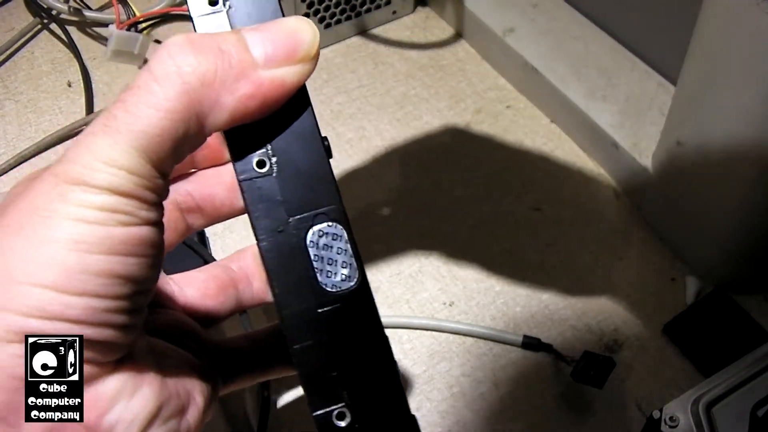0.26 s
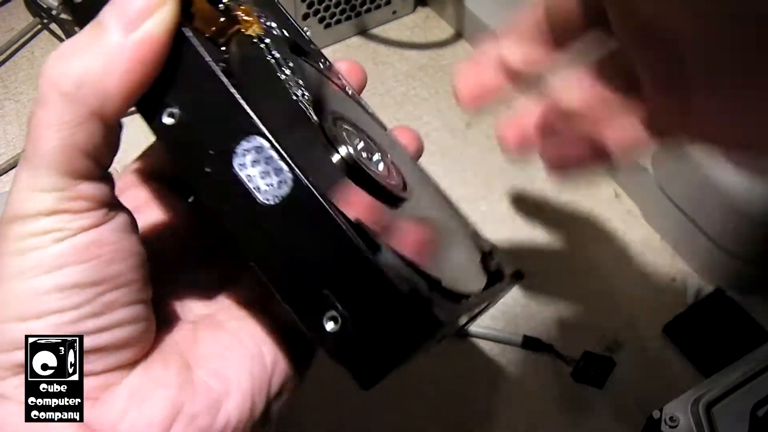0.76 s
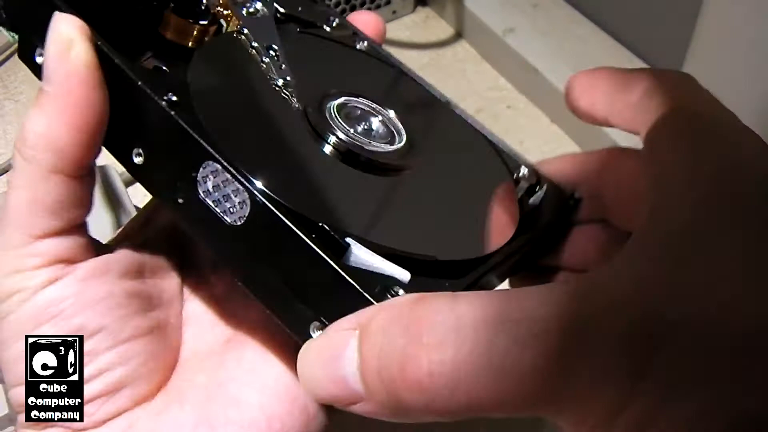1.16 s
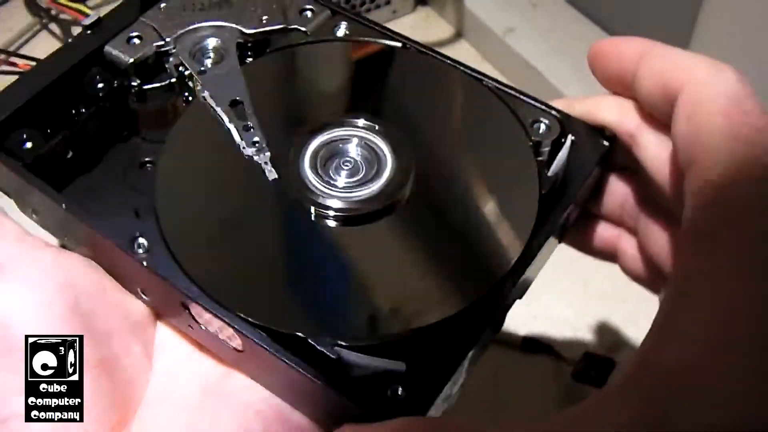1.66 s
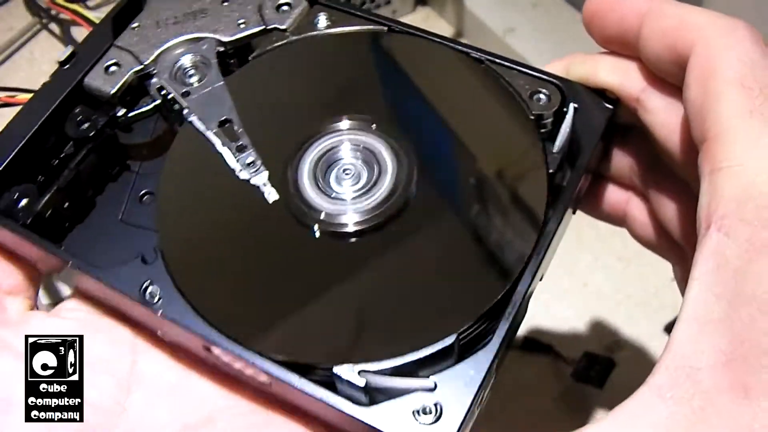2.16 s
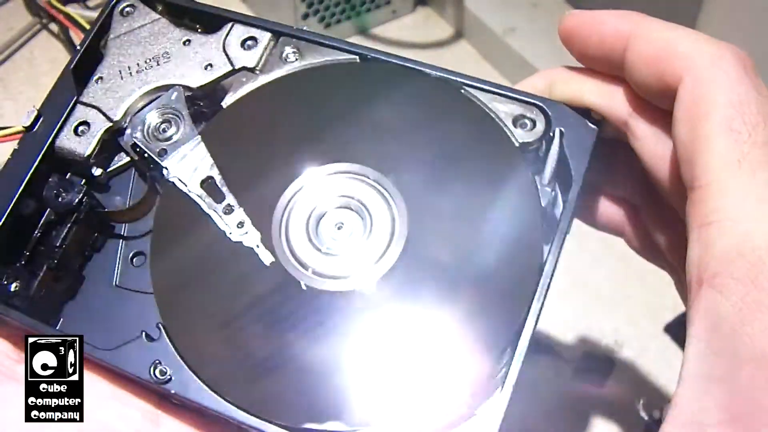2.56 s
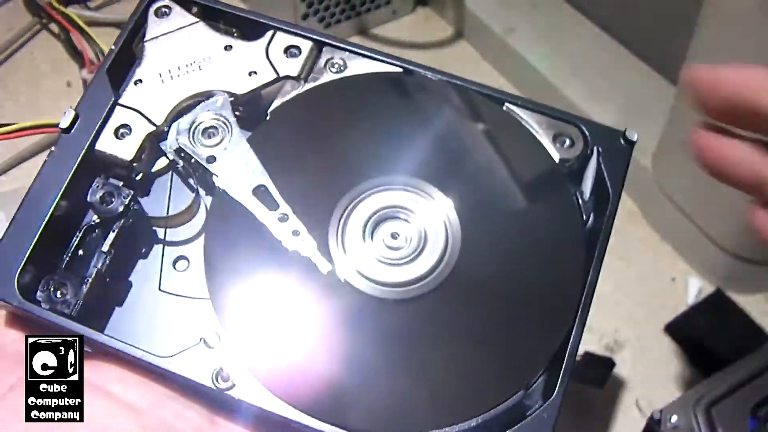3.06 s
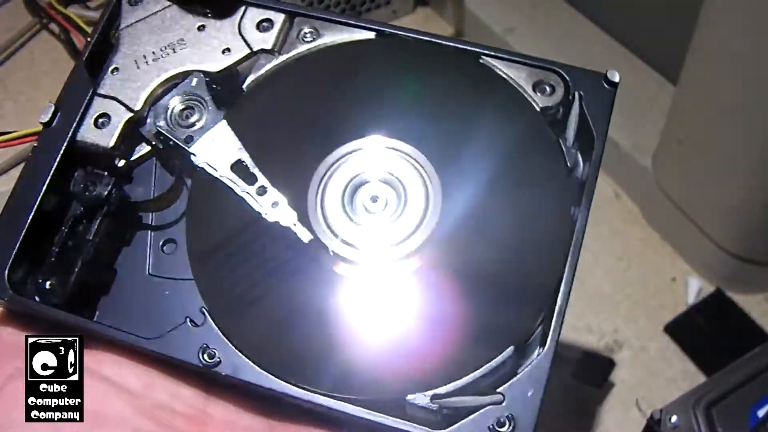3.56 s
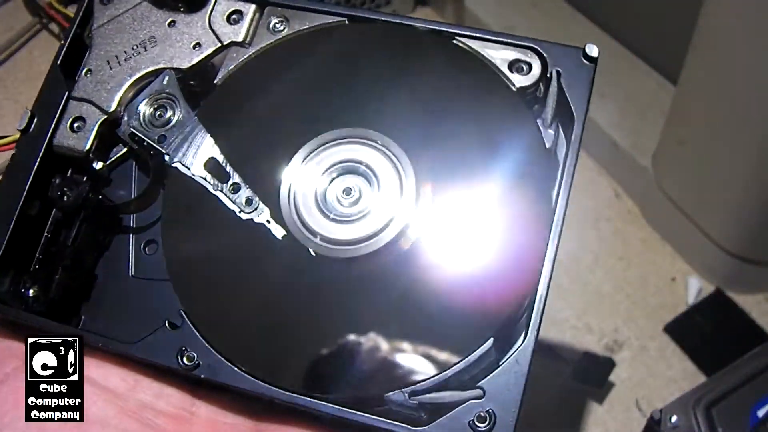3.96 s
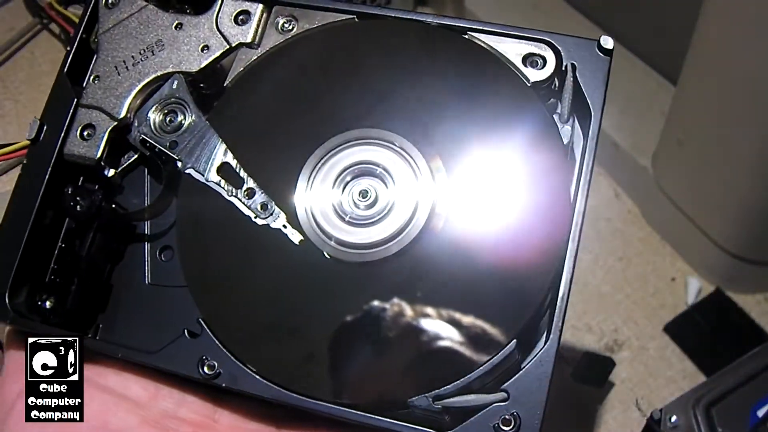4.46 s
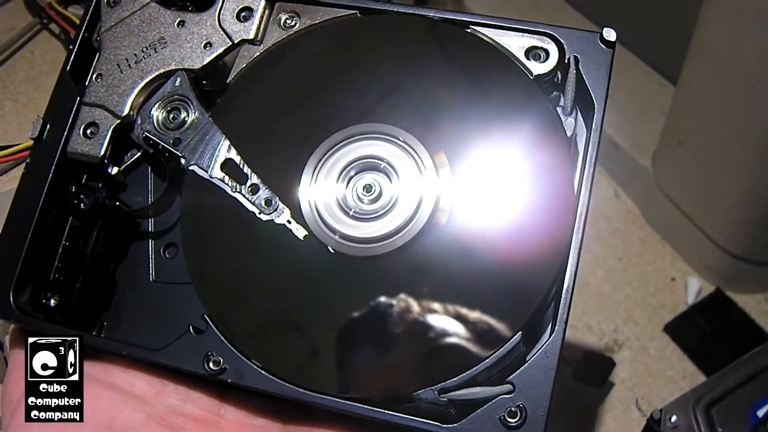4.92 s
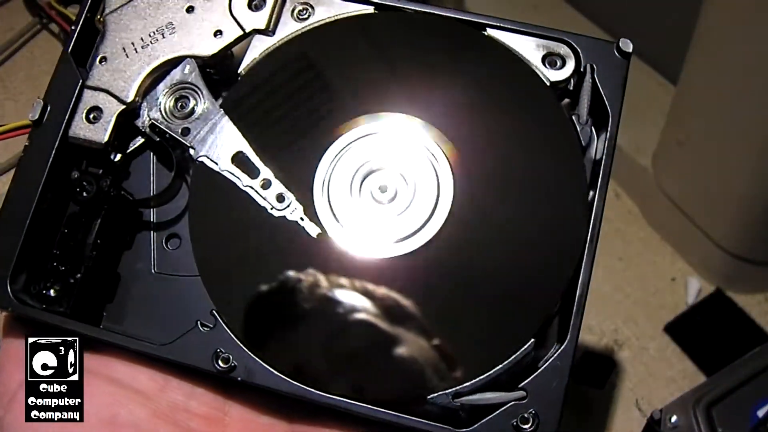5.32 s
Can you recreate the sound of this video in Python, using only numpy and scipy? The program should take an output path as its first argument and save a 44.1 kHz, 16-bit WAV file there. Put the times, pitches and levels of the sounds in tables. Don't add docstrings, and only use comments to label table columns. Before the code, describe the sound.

Short rattling start-up buzz, a few sharp taps, then a spinning disk motor chatters brightly and swells into a breathy, brightening whoosh of air.

```python
import sys
import numpy as np
from scipy import signal
from scipy.fft import rfft, irfft, next_fast_len
from scipy.io import wavfile
from scipy.ndimage import uniform_filter1d

SR = 44100
rng = np.random.default_rng(int(sys.argv[2]) if len(sys.argv) > 2 else 0)


def unload_wav(signal):
    wavfile.write(
        sys.argv[1],
        SR,
        np.round(np.clip(np.atleast_2d(signal).T, -1, 1) * 32767).astype(np.int16),
    )


def invert_db(level):
    return 10 ** (np.asarray(level, dtype=float) / 20)


N = 246519
T = np.arange(N) / SR


def speed(t):
    start_s, gain_per_s, top_steps_per_s = .623, 98.1, 990
    return top_steps_per_s * np.tanh(gain_per_s * np.maximum(t - start_s, .01) / top_steps_per_s)


def whine():
    # f/Hz, width/Hz
    frame_low = [(6000, 100), (6780, 110), (7100, 70), (7730, 90), (8430, 120), (9300, 200), (10110, 140)]
    # f/Hz, width/Hz
    frame_mid = [(11280, 260), (12280, 170), (13020, 200), (13300, 250), (13600, 200)]
    # f/Hz, width/Hz
    frame_top = [(14030, 220), (15150, 150), (15620, 180)]
    # level/dB, loudest at speed/(steps/s)
    wake = [(-9.5, 140), (-4, 286), (-19, 95), (-5.5, 230), (-7.5, 247), (-5.5, 228), (-3, 248), (-10, 174),
            (-6.5, 230), (-6.5, 220), (-5.5, 82), (-9, 360), (-4.5, 220), (-10.5, 124), (-3.5, 115)]
    # f/Hz, level/dB
    between = [(2500, -41), (4500, -12), (5500, -7), (6500, -2), (8000, -2), (11000, -2), (14000, -2),
               (16000, -11)]
    # multiple, level/dB, loudest at t/s, duration/s
    multiples = [
        (48, -48, 4.0, .25),
        (38, -49, 4.35, .25),
        (32, -49, 4.65, .3),
        (24, -48, 5.0, .5),
    ]
    coils_on_s, rise_s = .9, .04
    full_steps_per_s = 243
    lull_db, lull_steps_per_s, lull_spread = -3, 370, 30

    rate = speed(T)
    level_db = -39.5 + 2.5 * np.log2(np.minimum(rate / full_steps_per_s, 1))
    level_db = level_db + lull_db * bump(rate, lull_steps_per_s, lull_spread)
    on = np.clip((T - coils_on_s) / rise_s + .5, 0, 1) * (T > coils_on_s)

    steps = np.cumsum(rate * (T > coils_on_s)) / SR
    snap = np.diff(np.floor(steps), prepend=0) * np.sqrt(SR / rate)
    chatter = (.9 + np.exp(-(steps % 1) / .35)) * rng.standard_normal(N)
    drive = .3 * snap + chatter

    rings = 0
    for (hz, width), (db, best) in zip(frame_low + frame_mid + frame_top, wake):
        waver = invert_db(db + 1.1 * drift(3.096))
        rings = rings + waver * bump(rate, best, 94) * evened(ring(drive, hz, width))
    broad = evened(shaped(drive, lambda hz: invert_db(read(between, hz))))
    clean = 0
    for k, db, s, span in multiples:
        clean = clean + invert_db(db) * bump(T, s, span) * np.cos(2 * np.pi * k * steps) * (k * rate < 17000)
    return invert_db(level_db) * (rings + broad) * on + clean


def search():
    # start t/s, hold/s, level/dB
    search_at = (.318, .542, -33)
    weak_kicks = [2, 4, 6, 8, 10]
    # f/Hz, level/(dB per Hz)
    kick_colour = [(1060, -12), (1800, 7.5), (2380, -38), (2680, -24), (2910, -5.5), (3320, -5.5),
                   (5580, -7), (6650, 0), (9120, -4.5), (9820, -8), (14000, -9), (16000, -16), (16500, -46)]
    # f/Hz, width/Hz, level/dB
    kick_rings = [(2730, 35, -8), (3300, 36, -13), (4500, 36, -17), (4860, 33, -1), (5470, 71, -4),
                  (6000, 54, -5), (6240, 27, -3), (6900, 49, 5), (7600, 32, -8), (7800, 38, 2),
                  (8230, 50, 0.5), (8460, 22, -6), (9280, 36, 1), (10800, 70, -7)]
    kicks_hz, release_s = 161.2, .012

    start, hold, top_db = search_at
    end = start + hold + release_s
    since = np.clip(T - start, 0, hold)
    level_db = top_db + held_db(start, hold, 0, 16 / release_s)
    low_db = -21.5 + 20 * since
    middle_db = -8 - 11 * np.exp(-since / .08)

    kicks = (T - start) * kicks_hz
    on = (T >= start) & (T < end)
    strength = on * np.where(np.isin(kicks.astype(int), weak_kicks), .25, 1)
    burst = 8 * smear(spread_ms=1.3)
    alike = 1.48 * signal.oaconvolve(np.diff(np.floor(kicks), prepend=0), burst)[:N]
    swell = np.sin(np.pi * np.minimum(kicks % 1 / 0.8, 1) ** 0.48) ** 2
    puff = (0.51 + swell) * rng.standard_normal(N)
    drive = strength * (alike + puff)

    broad = shaped(drive, lambda hz: invert_db(read(kick_colour, hz)))
    patches = [invert_db(1.1 * drift(11.4)) * ring(broad, hz, 1200) for hz in np.linspace(2800, 15400, num=15)]
    broad = evened(sum(patches))
    broad = signal.sosfilt(signal.butter(6, 2550, "high", fs=SR, output="sos"), broad)
    rings = [invert_db(db + 1.5 * drift(6.5)) * ring(drive, hz, width + 30) for hz, width, db in kick_rings]
    low = invert_db(low_db) * evened(ring(ring(drive, 2740, 55), 2620, 120))
    middle = invert_db(middle_db) * evened(ring(ring(drive, 6745, 70), 6800, 200))
    body = invert_db(0.5) * broad + invert_db(-6.5) * evened(sum(rings)) + invert_db(-2.0) * low + invert_db(-6.0) * middle
    return invert_db(level_db) * body * np.sqrt((end - start) * SR / N)


def air():
    # f/Hz, level/(dB per Hz)
    rush_colour = [(150, -47.5), (250, -19.5), (513, -21.5), (868, -15), (1210, -10.5), (1600, -2),
                   (2010, -6), (2860, -2.5), (4670, -6.5), (7370, -10.5), (7760, -14), (9420, -11.5),
                   (13000, -20), (15700, -21), (16500, -53)]
    # f/Hz, width/Hz, level/dB
    hollow_rings = [(1622, 320, 4), (2374, 450, 4.5), (2790, 220, 2.5), (3700, 550, 2), (840, 77, 3.5)]
    # f/Hz, growth/(dB per dB)
    growth = [(400, 0.95), (780, .8), (1150, 0.88), (1600, 0.85), (2050, 1.09), (2800, 1.18), (3400, 1.21),
              (4300, 1.43), (5500, 1.21), (9000, 1.33), (15000, 1.35)]
    from_steps_per_s = 107

    def field_db(hz, t):
        hollows = sum(db / (1 + (2 * (hz - f) / width) ** 2) for f, width, db in hollow_rings)
        excess = np.maximum(speed(t) - from_steps_per_s, 1)
        under_db = 32.5 * np.log10(excess / (speed(N / SR) - from_steps_per_s))
        return read(rush_colour, hz) + hollows + read(growth, hz) * under_db

    noise = hiss(field_db, patchy_db=0.53)
    return invert_db(-17) * noise / noise[:, -SR // 4:].std()


def clicks():
    # t/s, peak level/dB, scuff level/dB, time until the grip stops the ring/ms
    touches = [
        (0.0094, -26, 0.5, 150),
        (0.2434, -37, -1, 12),
        (0.531, -28, -3, 5.2),
        (0.868, -31, -1, 40),
        (1.3394, -12, -1.5, 14),
        (1.3566, -21.5, -7, 9),
        (1.4369, -31, 3, 8),
        (1.6504, -15, -3, 37),
        (1.938, -10.5, -2.5, 11.6),
    ]
    # f/Hz, level/dB, time to fall 60 dB/s
    lid = [(2090, -17.5, 0.6), (2520, 2, 0.0073), (5000, 0, 0.0071), (6200, 4, .01), (7460, 7, .008)]
    # f/Hz, level/dB, time to fall 60 dB/s
    skin = [(2360, -4, 0.011), (4800, 3, 0.0069), (6100, -3, 0.011), (7400, 8, .008)]
    # f/Hz, level/dB, time to fall 60 dB/s
    latch = [(1600, -3.5, 0.14), (2625, -5.5, 0.039), (3450, -29, 0.018), (4790, -16, 0.026),
             (6250, -29, .02)]
    # f/Hz, level/dB, time to fall 60 dB/s
    stop = [(1300, 0, 0.022), (1900, -6, 0.022), (2750, 2, 0.022), (7770, -8, .2)]
    # f/Hz, level/dB, time to fall 60 dB/s
    case = [(1850, 4, 0.0082), (2500, 4, 0.0065), (4800, -15, 0.0052), (5500, 5, 0.011), (7100, -12, 0.011),
            (10600, -10, .008)]
    # f/Hz, level/dB, time to fall 60 dB/s
    rim = [(2260, -8, 0.0043), (2770, 0, 0.005), (3430, 1, 0.0036), (6140, -2, .015), (1870, -16, 0.12)]
    parts = [lid, skin, latch, stop, case, skin, skin, rim, latch]
    rattle_ms, scuff_hz = 3.4, 4640

    out, t = np.zeros(N + 8000), np.arange(8000) / SR
    fade = np.exp(-t * 1000 / rattle_ms) * np.minimum(t / .0004, 1)
    for (s, peak_db, scuff_db, held_ms), modes in zip(touches, parts):
        chance = rng.standard_normal((2, 8000))
        knocks = chance[0] ** 3 * fade ** 2 * 0.049
        knocks[24:28] += 1
        rings = sum(invert_db(db - 60 * t / t60) * np.sin(2 * np.pi * hz * t) for hz, db, t60 in modes)
        rung = signal.fftconvolve(knocks, rings)[:8000] * np.exp(-(t * 1000 / held_ms) ** 3)
        scuff = ring(chance[1] * fade, scuff_hz, 0.87 * scuff_hz)
        out[round(s * SR):][:8000] += invert_db(peak_db) * (rung / abs(rung).max() + invert_db(scuff_db) * scuff)
    thin = signal.butter(4, 1300, "high", fs=SR, output="sos")
    return signal.sosfilt(thin, out[:N])


def rub():
    # start t/s, hold/s, level/dB, release/(dB/s)
    strokes = [
        (1.4, .52, -50, 60),
        (1.648, .012, -44, 250),
    ]
    noise = evened(hiss(lambda hz, t: 0 * t - 9 * np.log2((hz + 1) / 3800) ** 2, patchy_db=1.8))
    return sum(invert_db(db + held_db(s, hold, 904, fall)) for s, hold, db, fall in strokes) * noise


def room():
    # f/Hz, level/(dB per Hz)
    fan_colour = [(12, -32), (20, 0), (22, -3), (53, 0.5), (91, -24), (125, -2), (168, -13), (226, -12.5),
                  (274, -2.5), (333, -8), (353, -14), (468, -9.5), (700, -18), (910, -16.5), (1540, -120)]
    # f/Hz, level/(dB per Hz)
    hiss_colour = [(350, -39.5), (600, -8.5), (689, -11.5), (1140, -12), (1670, -10.5), (3080, -13),
                   (4180, -11.5), (14800, -21), (16500, -31)]
    # f/Hz, likeness from -1 to 1
    room_same = [(60, 0.41), (130, -0.39), (290, 0.11), (640, -0.18), (1410, -0.46), (3100, -0.31),
                 (6820, -0.27), (15000, 0.15)]
    # f/Hz, level/dB
    room_lean = [(60, 1.1), (240, 1.9), (950, 0.38), (3770, 0.79), (15000, -0.85)]
    rumble = invert_db(-50) * evened(hiss(lambda hz, s: read(fan_colour, hz) + 0 * s, patchy_db=1.14))
    floor = invert_db(-46.5) * evened(hiss(lambda hz, s: read(hiss_colour, hz) + 0 * s, patchy_db=1.5))
    return invert_db(3.5) * ports(rumble + floor, room_same, room_lean, [(1, 0), (2, 0)])


def scattered(x, spread_ms):
    turn = 2 * np.pi * 1.7 * T
    paths = [signal.oaconvolve(x * share, smear(spread_ms))[:N] for share in (np.cos(turn), np.sin(turn))]
    return np.array([x, sum(paths)])


def smear(spread_ms):
    late = np.repeat(rng.exponential(spread_ms * SR / 1000, 128), 8)
    return irfft(np.exp(-2j * np.pi * np.cumsum(np.minimum(late, 1500)) / 2046))


def ports(pair, same, lean, lead):
    def like(hz):
        return np.clip(read(same, hz), -1, 1)

    def tilt(hz):
        return invert_db(read(lean, hz) / 2)

    left = shaped(pair[0], tilt)
    shared = shaped(pair[0], lambda hz: like(hz) * np.exp(-1j * read(lead, hz)) / tilt(hz))
    other = shaped(pair[1], lambda hz: np.sqrt(1 - like(hz) ** 2) / tilt(hz))
    return np.array([left, shared + other])


def hiss(field_db, patchy_db):
    frames, hz = N // 256 + 5, np.fft.rfftfreq(1024, 1 / SR)
    a, b, patches = rng.standard_normal((2, frames, 513, 3)).T
    patches = uniform_filter1d(uniform_filter1d(patches, size=10, axis=0), size=8, axis=1)
    level_db = field_db(hz[:, None], np.arange(frames) * 256 / SR)[..., None]
    z = (a + 1j * b) * invert_db(level_db + patchy_db * evened(patches))
    return signal.istft(z.transpose(2, 0, 1), nperseg=1024, noverlap=768)[1][:, :N]


def ring(x, hz, width_hz):
    r = np.exp(-np.pi * width_hz / SR)
    turn = 2 * np.pi * hz / SR
    return signal.lfilter([(1 - r * r) / 2, 0, (r * r - 1) / 2], [1, -2 * r * np.cos(turn), r * r], x)


def drift(rate_hz):
    t = T[::200]
    waves = [np.sin(2 * np.pi * (f * t + rng.random())) for f in rate_hz * np.geomspace(.2, 1, num=6)]
    return np.interp(T, t, evened(sum(waves)))


def shaped(x, gain):
    size = next_fast_len(N + 4096)
    return irfft(rfft(x, size) * gain(np.fft.rfftfreq(size, 1 / SR)), size)[..., :N]


def evened(x):
    return x / np.sqrt(np.mean(x ** 2) + 1e-20)


def read(points, hz):
    f, value = np.transpose(points)
    return np.interp(np.log(hz + 1), np.log(f + 1), value)


def bump(x, centre, spread):
    return np.exp(-((x - centre) / spread) ** 2)


def held_db(start, hold, rise, fall):
    return -rise * np.maximum(start - T, 0) - fall * np.maximum(T - start - hold, 0)


def starved(x, under_db):
    hz, _, z = signal.stft(x, SR, nperseg=1024, noverlap=768)
    power = abs(z.mean(axis=0)) ** 2
    power = uniform_filter1d(uniform_filter1d(power, size=7, axis=0), size=6, axis=1)
    treble = uniform_filter1d(power[(hz > 9000) & (hz < 15000)].mean(axis=0), size=7)
    treble = np.where(treble > 5 * np.percentile(treble, q=3), treble, 0)
    middle = (hz > 2300) & (hz < 6800)
    weak = (power < treble * invert_db(2 * under_db)) & middle[:, None]
    return signal.istft(z * np.where(weak, .05, 1), SR, nperseg=1024, noverlap=768)[1][:, :N]


def scene():
    # f/Hz, likeness from -1 to 1
    drive_same = [(300, -1), (700, 1.6), (1500, 1.6), (3100, 0.78), (6000, 0.08), (9000, 0.33),
                  (14000, 0.44)]
    # f/Hz, level/dB
    drive_lean = [(300, 1.5), (950, 2.5), (2400, .5), (4500, -2), (8000, -4.5), (15000, -2)]
    # f/Hz, phase/rad
    drive_lead = [(300, -1.1), (700, -0.46), (3700, -0.43), (5900, 0.91), (7800, -0.54), (10800, -1.05),
                  (14000, 0.64)]
    motor = scattered(search() + whine(), spread_ms=2.5)
    taps = scattered(clicks(), spread_ms=0.808)
    return ports(motor + air() + rub() + taps, drive_same, drive_lean, drive_lead) + room()


def top_cut(x):
    return signal.sosfilt(signal.butter(12, 17090, fs=SR, output="sos"), x)


def record(dry):
    def response(hz):
        notch = 1 - .88 / (1 + ((hz - 7890) / 75) ** 2)
        band_limit = 1 / (1 + (hz / 15800) ** 400)
        return notch * band_limit

    heard = shaped(starved(dry, under_db=-6.9), response)
    return top_cut(heard - .0043)


dry = scene()
out = record(dry)
unload_wav(out)
```